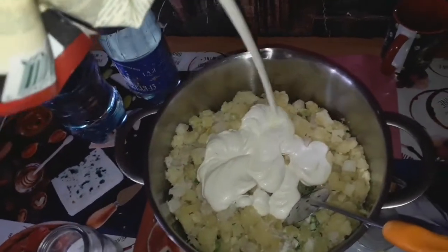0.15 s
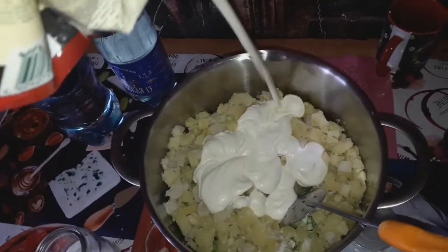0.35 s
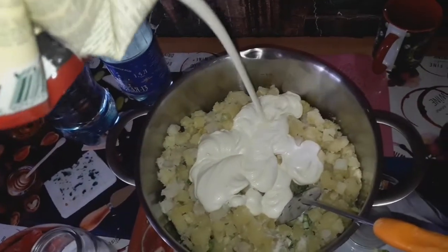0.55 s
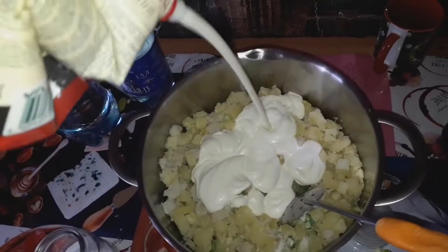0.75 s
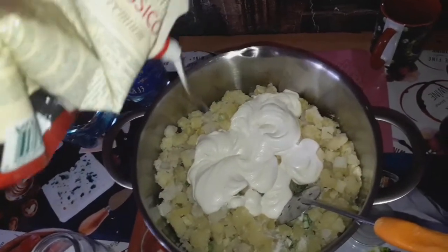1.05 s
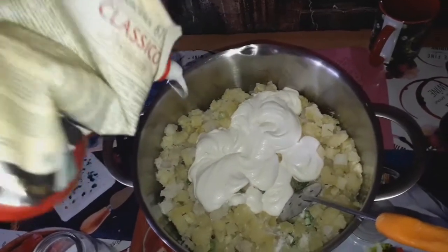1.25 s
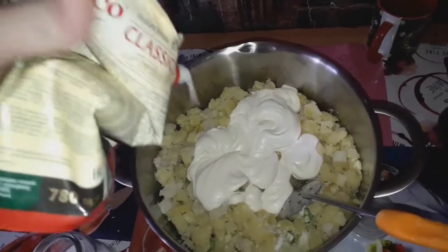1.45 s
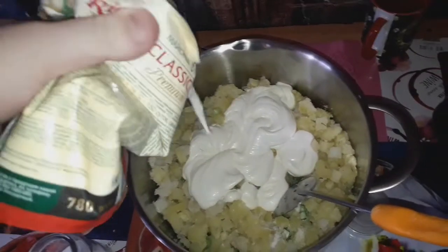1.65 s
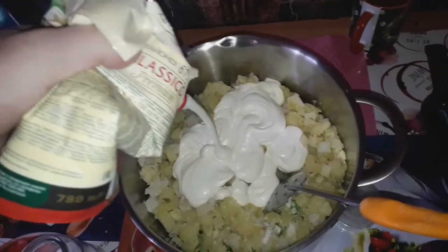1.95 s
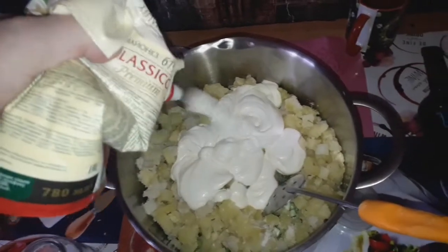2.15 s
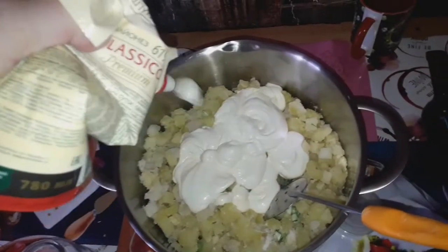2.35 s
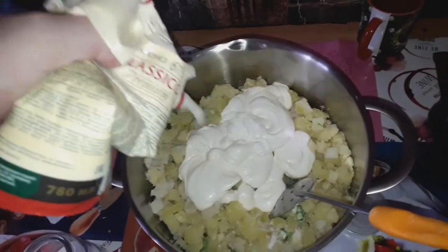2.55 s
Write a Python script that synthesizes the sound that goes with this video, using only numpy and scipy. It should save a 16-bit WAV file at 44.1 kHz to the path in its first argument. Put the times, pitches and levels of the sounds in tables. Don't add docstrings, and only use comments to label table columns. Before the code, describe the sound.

A soft pouch of thick sauce is squeezed close to the microphone in a small, reflective kitchen. Faint hum and a distant rush that drops away around 0.5 s; tiny wet ticks, sharper from 0.5 to 0.9 s. Film rustles near 1 s, with crisp snaps from 1.2, crowding at 1.6-2.0 s. From 2.04 s loud, rapid, whistling air pops sputter, softening by 2.4 s into small ticks.

```python
import sys
import numpy as np
from scipy import signal
from scipy.fft import rfft, irfft
from scipy.io import wavfile
from scipy.ndimage import uniform_filter1d, minimum_filter1d

SR = 44100
rng = np.random.default_rng(int(sys.argv[2]) if len(sys.argv) > 2 else 0)


def volts(x):
    e = np.asarray(x, float) / 20
    return 10 ** e


def transcribe(u):
    v = np.clip(np.atleast_2d(u).T, -1, 1)
    q = np.round(v * 32767).astype(np.int16)
    wavfile.write(sys.argv[1], SR, q)


N = 119070
SHORT = 1300


def unit(x):
    return x / np.sqrt(np.mean(x ** 2))


def colour(x, points):
    hz, db = np.transpose(points)
    f = np.arange(len(x) // 2 + 1) * SR / len(x) + 1
    gain = volts(np.interp(np.log(f), np.log(hz), db))
    return irfft(rfft(x) * gain, len(x))


def curve(points):
    seconds, db = np.transpose(points)
    return volts(np.interp(np.arange(N) / SR, seconds, db))


def band(x, hz, width):
    f = np.arange(len(x) // 2 + 1) * SR / len(x)
    return irfft(rfft(x) * np.exp(-((f - hz) / width) ** 2), len(x))


def band_noise(hz, width):
    return unit(band(rng.standard_normal(N), hz, width))


def add(out, s, sound):
    i = int(s * SR)
    out[i:i + len(sound)] += sound[:N - i]


def ring(hz, cycles, db, rise=1.16):
    c = np.arange(SHORT) / SR * hz
    decay = volts(db - 20 * np.maximum(c - rise, 0) / cycles)
    swell = np.sin(np.pi / 2 * np.minimum(c / rise, 1)) ** 2
    return decay * swell * np.sin(2 * np.pi * c)


def crack(db, chance, hz, width):
    t = np.arange(SHORT) / SR
    decay = volts(db - 20 * t / 0.003143)
    return decay * np.minimum(t / 0.00018, 1) * unit(band(chance[1:], hz, width))


def glide(hz, end_hz, length, bend):
    u = np.arange(SHORT) / SR / length
    pitch = hz + (end_hz - hz) * np.minimum(u, 1.1) ** bend
    return np.sin(2 * np.pi * np.cumsum(pitch) / SR), u


def kitchen():
    # frequency in Hz, level in dB per Hz.
    hum_colour = [(25, -16), (84, -26), (110, -8), (200, -3), (400, -4), (1200, -18.5), (4500, -28),
                  (8500, -32.5), (10000, -45), (16000, -35)]
    # time in seconds, level in dB.
    hum_level = [(0, -55), (.5, -56.5), (.7, -57.5), (1.0, -53.5), (1.55, -56), (2.0, -57), (2.4, -58),
                 (2.7, -66)]
    # frequency in Hz, width in Hz, level in dB.
    whines = [(100, 12, -14.5), (14702, 170, -22)]
    # time in seconds, level in dB.
    rush_level = [(0, -9), (.45, -8), (.58, -19.5), (.78, -26.5), (2.7, -22.5)]
    # frequency in Hz, width in Hz, level in dB.
    rush_whines = [(1150, 78, -6), (1326, 50, -9.5), (2629, 60, -9), (4000, 80, -15.5)]
    # time in seconds, level in dB.
    thin_level = [(0, -20.5), (.5, -21), (.65, -19.5), (.8, -18.5), (.95, -34), (2.7, -37)]

    rush = band_noise(2200, 2300)
    for hz, width, db in rush_whines:
        rush += volts(db) * band_noise(hz, width)
    hum = unit(colour(rng.standard_normal(N), hum_colour))
    hum += curve(rush_level) * rush + curve(thin_level) * band_noise(5020, 14)
    for hz, width, db in whines:
        hum += volts(db) * band_noise(hz, width)
    tube_hz, tube_db = 14702, -84
    tube = volts(tube_db) * np.sin(2 * np.pi * tube_hz * np.arange(N) / SR)
    return tube + curve(hum_level) * hum


def rustle():
    # time in seconds, level in dB.
    movement = [(0, -67.5), (.55, -71.5), (.78, -68), (.84, -53.5), (1.0, -50.5), (1.15, -54.5),
                (1.5, -66.5), (1.6, -70.5), (2.0, -64.5), (2.2, -56.5), (2.5, -66.5), (2.7, -74.5)]
    # frequency in Hz, level in dB.
    film_colour = [(90, -40), (200, -4.5), (1300, -5), (2100, -11), (7000, -17), (10000, -27.5),
                   (13000, -25.5), (16000, -30.5)]
    creases_per_s, scatter_db = 3700, 0.44
    struck = rng.random(N) < creases_per_s / SR
    size = volts(scatter_db * rng.exponential(size=N))
    hits = struck * size * rng.standard_normal(N)
    return unit(colour(hits, film_colour)) * curve(movement)


def ticks():
    # start in seconds, peak in dB, pitch in Hz, cycles to fall 20 dB.
    bursts = [(.039, -47, 8010, 6.5), (.066, -51.5, 8000, 4.5), (0.2741, -36, 7220, 6.5),
              (.2745, -42.5, 4490, 7), (.2747, -44, 5150, 5), (.2747, -47.5, 3750, 4.5),
              (.541, -47.5, 4550, 6.5), (0.7093, -49, 8200, 4.5), (.918, -49, 11000, 5.5),
              (.969, -52.5, 13000, 3), (1.104, -46, 9000, 3.5), (0.287, -38, 8990, 5.5),
              (0.3219, -43, 3150, 2.5), (.5227, -19.5, 10810, 2), (0.5405, -31.5, 7660, 5.5),
              (.5584, -39, 9770, 0.5), (.618, -33, 8980, 5.5), (0.679, -41.5, 8150, 5),
              (.6994, -56, 10500, 3), (.7337, -11, 7410, 15.5), (0.7337, -32.5, 3586, 5),
              (0.7334, -32.5, 4765, 5.5), (.7341, -34, 5670, 7), (.7443, -34, 7170, 4),
              (.748, -34, 7400, 6.5), (.752, -23.5, 7400, 8.5), (.7612, -23.5, 7430, 11),
              (.7648, -32, 7520, 10), (.823, -12.5, 7784, 7.5), (0.8362, -35, 1770, 6),
              (0.8903, -17, 8365, 4.5), (0.8902, -21.5, 6477, 4.5), (0.8909, -28.5, 5630, 11),
              (.941, -39, 4000, 5), (2.387, -22.5, 3604, 5), (2.460, -19, 7210, 1.5),
              (2.5282, -37, 3498, 6.5), (2.5613, -30.5, 3630, 4)]
    rise, spread = 4.01, 0.0281
    out = np.zeros(N)
    for s, db, hz, cycles in bursts:
        first = ring(hz, cycles, db - 2, rise)
        lingering = ring(hz * (1 + spread), cycles * 4.46, db - 16, 3 * rise)
        skin = crack(db - 23.5, rng.standard_normal(SHORT + 1), hz * 0.891, hz / cycles)
        add(out, s + 0.00077, first + lingering + skin)
    return out


def crackles():
    # start in seconds, peak in dB, centre in Hz, width in Hz.
    noise_bursts = [(2.041, -35.5, 12850, 705), (2.0486, -30, 7800, 1200), (2.072, -36.5, 13020, 700),
                    (2.077, -28.5, 6000, 899), (2.101, -29.5, 13030, 800), (2.106, -24.5, 7410, 1300),
                    (2.129, -19.5, 9400, 4500), (2.168, -30, 10900, 4500), (2.200, -29, 9000, 5040),
                    (2.212, -24, 8280, 1200), (2.2325, -27.5, 8830, 6000), (2.285, -41, 8900, 3000),
                    (2.3097, -44.5, 7900, 2000), (2.360, -36, 10800, 4500), (2.369, -34, 7500, 1494),
                    (2.387, -38.5, 10800, 4985), (2.461, -39, 12490, 3000), (2.5616, -43.5, 9840, 4990),
                    (2.6883, -51.5, 8990, 6010), (1.592, -35, 12740, 3000), (2.0504, -12.5, 2700, 500),
                    (2.061, -14.5, 2100, 500), (2.0803, -16, 3000, 700.4), (2.2327, -16.5, 2200, 600),
                    (2.234, -27, 5699, 400), (1.8257, -24.5, 7410, 1490), (1.862, -26, 6460, 900),
                    (1.592, -27, 8000, 1400), (1.6005, -36, 6500, 2500), (1.8255, -37, 11300, 1500),
                    (1.893, -36, 11500, 2000), (1.783, -32, 4600, 700), (.93, -40, 900, 500),
                    (.941, -42, 2700, 500), (.837, -42, 3500, 1500), (1.01, -40, 7300, 1200),
                    (1.192, -33, 3300, 1200), (1.192, -40, 7000, 1500), (1.183, -27, 4200, 900)]
    out = np.zeros(N)
    for s, db, hz, width in noise_bursts:
        add(out, s + 0.0006, crack(db, rng.standard_normal(SHORT + 1), hz, width))
    return out


def snaps():
    # start in seconds, peak in dB, hollow in Hz, hollow in dB, film in Hz.
    creases = [(0.96, -38, 1730, -2, 4340), (.986, -39, 1300, -1, 2420), (1.004, -35, 1296, 4, 2720),
               (1.009, -35, 1500, 1, 2600), (1.161, -35.5, 731, 11, 3280), (1.1827, -15, 950, 0, 3100),
               (1.277, -35.5, 890, -3.5, 2850), (1.2953, -11, 947.5, 0, 4500),
               (1.298, -23.5, 1207, 1.5, 2500), (1.304, -26.5, 1150, 6, 4400), (1.317, -36, 1110, 11, 2600),
               (1.429, -40, 1200, -7.5, 3750), (1.583, -32, 1590, -6, 2960), (1.592, -10, 1583, -2.5, 3285),
               (1.645, -36, 759, 13.5, 2670), (1.6725, -24, 602, -9, 3200), (1.683, -34.5, 543, -1.5, 3500),
               (1.715, -18, 1610, -2.5, 2670), (1.783, -19, 1299, -0.5, 2920), (1.815, -33, 1212, 4, 2350),
               (1.825, -11, 1474, -24, 4270), (1.8278, -20, 1510, -4.5, 3600),
               (1.857, -33.5, 1410, 3.5, 2400), (1.8617, -12.5, 794.6, -4.5, 3250),
               (1.893, -3, 1206, -11.5, 3560), (1.9174, -31, 1302, 1, 3800),
               (1.9698, -11.5, 590.6, -6, 3390)]
    hollow_cycles, film_cycles = 1.9, 3.0
    out = np.zeros(N)
    for s, db, hollow_hz, hollow_db, film_hz in creases:
        chance = rng.standard_normal(SHORT + 1)
        ping = ring(film_hz, film_cycles, db - 0.5)
        crisp = crack(db - 24.5, chance[::-1], 6600, 1600)
        add(out, s + 0.001012, ping + crisp + crack(db - 14, chance, 3800, 3000))
        knock = ring(hollow_hz, hollow_cycles, db + hollow_db)
        overtone = ring(hollow_hz * 1.734, hollow_cycles, db + hollow_db - 7)
        add(out, s + 0.0009, knock + overtone)
    return out


def pops():
    # start in seconds, peak in dB, opening time in seconds, whistle in dB,
    # level at the end of the climb in dB.
    bursts = [
        (2.040, 3.5, 0.005516, -13, -0.5),
        (2.0695, -0.5, 0.00489, -0.5, -0.5),
        (2.100, 4, 0.0054, -6.5, -6.5),
        (2.128, 2, .0055, -1, -5),
        (2.157, 1.5, 0.00469, -5.5, -8),
        (2.212, -0.5, 0.005435, -2, -1.5),
        (2.284, -7.5, .008, -9, -4),
        (2.3595, -12, 0.007, -1, -8),
        (2.445, -40, 0.018, -25, 17),
    ]
    first_s = bursts[0][0]
    out = np.zeros(N)
    for s, db, length, whistle_db, end_db in bursts:
        chance = rng.standard_normal(SHORT + 1)
        start_hz = 1321.3 * (1 + 0.013 * chance[0]) - 60000 * (length - 0.0052)
        tone, u = glide(start_hz, 4085.6 * (1 + 0.03 * chance[1]), length, 1.7)
        sag_db = -9 * np.exp(-((u - 0.5) / 0.13) ** 2)
        shape_db = sag_db + end_db * np.minimum(u, 1) - 120 * np.maximum(u - 1, 0)
        shape = np.minimum(u / 0.1276, 1) * volts(shape_db)
        whistle_end_hz = 4400 * (1 + 0.9 * (s - first_s))
        high, v = glide(3363, whistle_end_hz, length * 0.9, 1.27)
        whistle = volts(whistle_db) * high * np.sin(np.pi * np.minimum(v / 1.252, 1)) ** 2
        ragged = volts(2.5 * unit(band(chance[1:], 500, 440)))
        thud_noise = unit(band(chance[:0:-1], 500, 300))
        thud = volts(-17 - 20 * u / 1.22) * np.minimum(u / 0.15, 1) * thud_noise
        add(out, s, volts(db - 3.5) * ((tone * shape + whistle) * ragged + thud))
    return out


def pot(x):
    # frequency in Hz, gain in dB.
    pot_colour = [(70, -12), (200, 1), (1500, 2), (2400, -3), (3200, -1.5), (3600, 3), (4100, -1),
                  (6000, -4)]
    return colour(x, pot_colour)


def room():
    # frequency in Hz, time to fall 60 dB in seconds.
    decay = [(125, 0.36), (250, 0.16), (500, 0.5437), (1000, 0.2827), (2000, 0.3626), (4000, 0.2424),
             (8000, 0.32), (14000, 0.5)]
    # delay in seconds, level in dB.
    reflections = [(.0028, -18.5), (.009, -11), (0.0109, -14.5), (.016, -18.5), (.021, -14)]
    t = np.arange(30000) / SR
    tail = np.zeros(len(t))
    for hz, t60 in decay:
        noise = unit(band(rng.standard_normal(len(t)), hz, hz * 0.5))
        tail += noise * np.sqrt(hz) * volts(-60 * t / t60)
    tail *= np.where(t < 0.009, np.minimum(t / 0.0016, 1), 1)
    tail /= np.sqrt(np.sum(tail ** 2))
    smear = rng.standard_normal(len(t))
    walls = np.zeros(len(t))
    for s, db in reflections:
        walls += volts(db - 1) * smear * np.exp(-((t - s) / 0.000418) ** 2) / 4
    return tail + walls


def scene():
    # frequency in Hz, gain in dB.
    snap_send = [(300, 3), (600, 2), (950, -1), (1500, 3.5), (2400, 0), (3500, -2), (4600, -1), (7000, -4)]
    # frequency in Hz, gain in dB.
    pop_send = [(250, 5), (550, -1), (1000, 0), (1500, -4), (2200, 6), (2900, 6), (3700, -3), (5000, 1.5)]
    background = kitchen() + rustle()
    wet_ticks = ticks() + crackles()
    film = snaps()
    air = pot(pops())
    sent = volts(-10) * wet_ticks + volts(-7) * colour(film, snap_send) + volts(-6) * colour(air, pop_send)
    clicks = wet_ticks + film + air + signal.fftconvolve(sent, room())[:N]
    body_cut = signal.butter(3, 110, "high", fs=SR, output="sos")
    return (signal.sosfilt(body_cut, clicks) + background)[None]


def low_pass(x):
    return signal.sosfilt(signal.butter(12, 16640, fs=SR, output="sos"), x)


def record(dry):
    bass_cut = signal.butter(2, 45, "high", fs=SR, output="sos")
    treble_cut = signal.ellip(8, 0.2, 60, 15900, fs=SR, output="sos")
    x = signal.sosfilt(treble_cut, signal.sosfilt(bass_cut, dry))
    ceiling, limit_s = 0.94, 0.0015
    span = int(limit_s * SR)
    gain = np.minimum(1, ceiling / (np.abs(x) + 1e-9))
    gain = minimum_filter1d(gain, 2 * span + 1)
    return low_pass(x * uniform_filter1d(gain, span))


dry = scene()
out = record(dry)
transcribe(out)
```